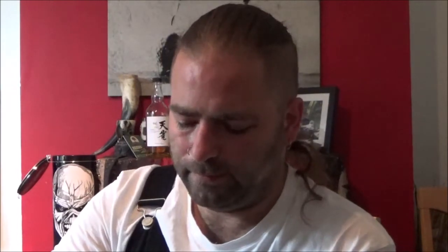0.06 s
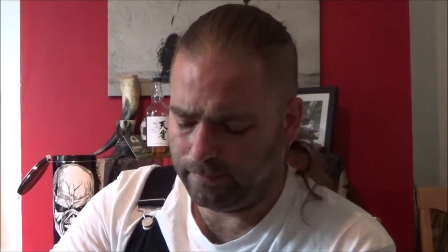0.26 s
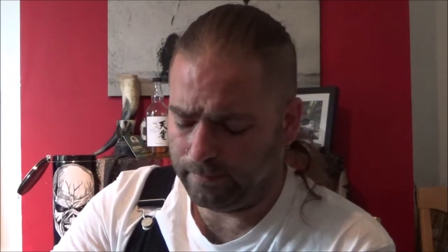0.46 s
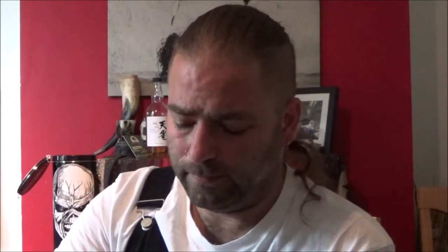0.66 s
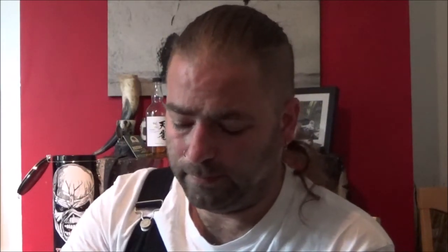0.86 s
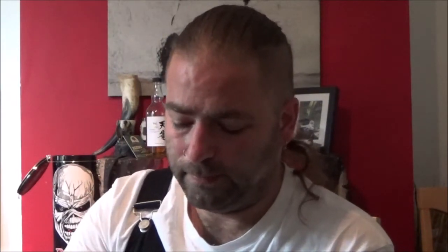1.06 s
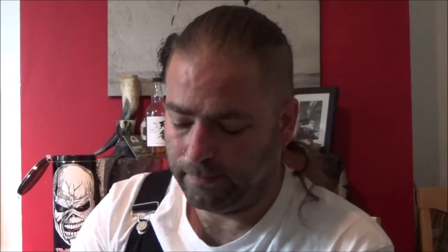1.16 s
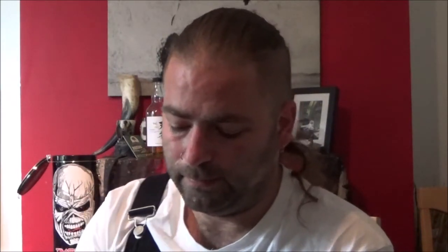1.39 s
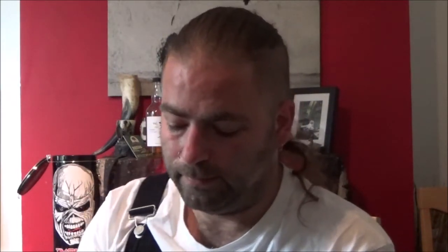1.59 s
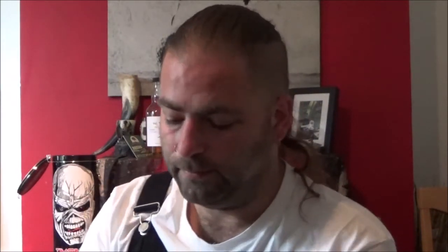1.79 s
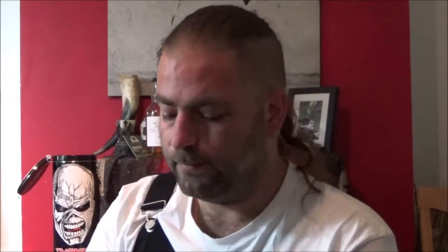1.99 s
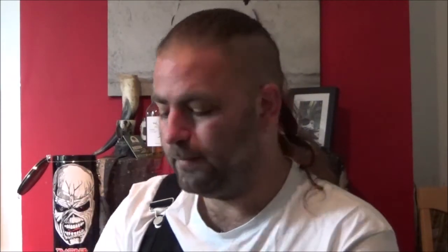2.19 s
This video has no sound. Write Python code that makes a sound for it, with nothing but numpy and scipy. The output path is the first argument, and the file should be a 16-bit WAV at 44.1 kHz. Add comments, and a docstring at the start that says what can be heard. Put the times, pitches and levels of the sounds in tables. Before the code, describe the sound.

Someone opens a drink can in a small room, then handles it with light taps.

```python
"""A drink can opened in a small, hard-walled room, about a metre from a camera's stereo microphone.
Room hiss and a faint ticking whine run throughout. After a soft rustle the seal cracks with a spit
of gas (0.25 s). Gas seeps, the tab clicks as it levers the lid (0.53 s), then the score tears and the
flap snaps in with a second spit, ringing the open can (0.77 s). Light rustles, taps and knocks of
handling follow. A fast limiter holds down the peaks."""
import sys
import numpy as np
from scipy import signal
from scipy.fft import rfft, irfft, next_fast_len
from scipy.io import wavfile
from scipy.ndimage import uniform_filter1d, minimum_filter1d

SR = 44100
rng = np.random.default_rng(int(sys.argv[2]) if len(sys.argv) > 2 else 0)


def generate_wav(sig):
    """Save sig (samples, or channels by samples) to the path in sys.argv[1] as 16-bit PCM at SR."""
    pcm = np.round(np.clip(np.atleast_2d(sig).T, -1, 1) * 32767).astype(np.int16)
    wavfile.write(sys.argv[1], SR, pcm)


N = 99225

# room tone spectrum (frequency [Hz], level [dB])
HISS_COLOUR = [(15, -25), (25, -10), (141, -3.5), (362, -3.5), (422, -4), (685, 0.5), (1200, -5),
               (1590, -3), (2710, -11), (3500, -8.5), (4070, -11), (4510, -12), (11000, -20.5),
               (14300, -29), (22000, -120)]
# hands and cloth sliding (start [s], hold [s], level [dB], tilt [dB/octave])
RUSTLES = [(0.147, 0.075, -54, 0), (0.887, 0.04, -50.5, 2.5), (1.083, 0.18, -57.5, 0),
           (1.716, 0.046, -50, -2), (1.831, 0.012, -49.5, 2), (2.101, 0.045, -52, -1), (2.173, .09, -51, 4)]
# rustle spectrum (frequency [Hz], level [dB])
RUSTLE_COLOUR = [(50, -38), (150, -4.5), (400, -3), (800, 0), (1500, -5.5), (3000, -8), (5000, -11),
                 (6500, -16), (8500, -12.5), (11000, -27)]
# tail off the walls (frequency [Hz], level [dB], t60 [s])
ROOM_TAIL = [(195, -33, 0.9), (740, 2.5, 0.28), (1610, 4, 0.24), (3970, 4, 0.24), (6940, 1, 0.24),
             (11200, -2, 0.23)]
# escaping gas (start [s], hold [s], level [dB])
GAS_SPITS = [(0.2436, 0.052, -26.5), (.768, 0.042, -28)]
# spit spectrum (frequency [Hz], level [dB])
GAS_COLOUR = [(300, -19.5), (1000, -25), (1500, -2.5), (2000, -14), (2700, -2.5), (3300, -2.5), (4000, 3.5),
              (4900, -2), (5400, -7), (6100, -5), (8000, 5.5), (9200, 1), (11000, -6)]
# seal cracking (time [s], level [dB])
SEAL_CRACKS = [(.2467, 11), (.2477, -1.5)]
# crack spectrum (frequency [Hz], level [dB])
CRACK_COLOUR = [(300, -33), (950, -28), (1500, 5), (1950, -1), (2600, 5.5), (3400, -2.5), (4400, 7.5),
                (6300, 5), (7300, 2), (8800, -1), (10300, -3.5)]
# seeping gas spectrum (frequency [Hz], level [dB])
SEEP_COLOUR = [(3000, -20.5), (4500, -10), (4950, -2), (5100, -3), (5300, -4), (5700, -20), (8000, -32)]
# tab levering and tearing the lid (time [s], level [dB], low cut [Hz])
TAB_CLICKS = [(.5331, 0, 1490), (.5338, -9.5, 1400), (.7335, -35.5, 1500), (.7408, -20.5, 1560),
              (.7425, -10, 1630), (.7470, -14.5, 1360), (.7505, -16, 1380), (.7523, -6.5, 1450),
              (.7562, -5.5, 1700), (.7571, -9.5, 1620)]
# modes of the closed lid (frequency [Hz], level [dB], t60 [s])
LID_MODES = [(1460, -26, 0.029), (1603, -22.5, 0.021), (1835, -15, 0.012), (3760, -27.5, 0.046),
             (4410, -13, 0.0088), (4700, -29, 0.011), (5320, -29, .01), (5906, -16.5, .018),
             (6254, -19.5, 0.023), (7690, -12, 0.006), (8400, -26, 0.0075), (9570, -24.5, 0.037)]
# spectrum of a tab click's rough edge (frequency [Hz], level [dB])
TAB_EDGE = [(500, -8), (1600, 2.5), (2400, -6), (3200, -6), (4400, 4.5), (6100, 1.5), (6900, -9.5),
            (7800, 14.5), (8500, -4.5), (11000, -7)]
# flap snapping in (time [s], level [dB], low cut [Hz])
FLAP_SNAPS = [(.7665, 0.5, 810), (.7678, -8.5, 800), (.7705, -10.5, 610), (.7790, -10, 386),
              (.7890, -7, 405), (.7950, -9.5, 390)]
# modes of the open can (frequency [Hz], level [dB], t60 [s])
CAN_MODES = [(644, -43, 0.033), (820, -27.5, 0.035), (892, -20, 0.029), (1034, -33.5, 0.014),
             (1257, -28, 0.035), (1760, -25.5, 0.036), (2370, -35, 0.033), (2890, -44, .02),
             (3585, -20, 0.036), (5080, -31, .015), (4860, -22, .015), (8300, -33, .015),
             (8330, -21, 0.016), (10450, -23, 0.023)]
# spectrum of a snap's rough edge (frequency [Hz], level [dB])
SNAP_EDGE = [(300, -9), (600, -12), (900, 7.5), (1400, 4.5), (3500, 8), (5000, 8), (6700, 2.5), (8500, 11),
             (11000, 6)]
# handling taps (time [s], level [dB], tilt [dB/octave], room send [dB])
TAPS = [(1.032, -25.5, 6, 0), (1.2685, -19, 7, -15), (1.414, -28, -3, 1.5), (1.433, -30, -8, 4),
        (2.0649, -4, -1.5, -7), (2.0706, -16, -7, -3), (2.215, -20, -4.5, -3.5)]
# tap spectrum (frequency [Hz], level [dB])
TAP_COLOUR = [(300, -31.5), (800, -12), (1400, -1), (2000, -5), (2700, 4.5), (3800, -4.5), (4800, -5),
              (6500, -10.5), (9200, -3), (11000, -24)]
# hollow handling knocks (time [s], pitch [Hz], level [dB], t60 [s])
KNOCKS = [(1.266, 221, -48, 0.048), (1.412, 1340, -46, .04), (1.435, 1270, -45.5, .04),
          (2.213, 1043, -37, 0.036)]

TOP_HZ = 11050
TIME = np.arange(N) / SR


def undb(db):
    """Decibels to gain."""
    return 10 ** (np.asarray(db) / 20)


def on_log(hz, points, column=1):
    """A table's column, joined by straight lines over log frequency."""
    table = np.array(points, float)
    return np.interp(np.log(hz + 1), np.log(table[:, 0]), table[:, column])


def colour(x, points, tilt_db=0):
    """Causal filter of unit power gain with the given spectrum and tilt per octave."""
    size = next_fast_len(2 * N) // 2 * 2
    hz = np.arange(size // 2 + 1) * SR / size
    gain = undb(on_log(hz, points) + tilt_db * np.log2(np.clip(hz, 500, TOP_HZ)))
    gain /= np.sqrt(np.mean(gain[hz < TOP_HZ] ** 2))
    cepstrum = irfft(np.log(gain))
    cepstrum[1:size // 2] *= 2  # fold to minimum phase
    cepstrum[size // 2 + 1:] = 0
    return irfft(rfft(x, size) * np.exp(rfft(cepstrum)))[..., :N]


def fade(t, t60):
    """Exponential decay from time zero."""
    return np.exp(-np.log(1000) * np.clip(t / t60, 0, 10))


def swell(start, hold, rise, t60):
    """Attack, hold and release; times in seconds."""
    t = TIME - start
    return np.clip(t / rise, 0, 1) * fade(t - hold, t60)


def strike(rows, response):
    """Play a response at each (time [s], level [dB])."""
    out = np.zeros(N)
    for start, db in rows:
        i = int(start * SR)
        out[i:] += undb(db) * response[:N - i]
    return out


def crackle(t60):
    """A very short noise burst of unit energy, like tiny fractures."""
    burst = rng.standard_normal(N) * fade(TIME, t60)
    return burst / np.sqrt(np.sum(burst ** 2))


def ring(modes):
    """Damped modes after one blow."""
    t = TIME[:SR // 2]
    ringing = sum(undb(db) * np.sin(2 * np.pi * hz * t) * fade(t, t60) for hz, db, t60 in modes)
    return np.pad(ringing, (0, N - len(t)))


def stereo_noise(side_db, alike_below_hz=223):
    """Noise that is mostly alike left and right, most of all in the bass."""
    mid, side = rng.standard_normal((2, N))
    side = signal.sosfilt(signal.butter(1, alike_below_hz, "high", fs=SR, output="sos"), side)
    return mid + undb(side_db) * side * np.array([[1], [-1]])


def room_hiss():
    """Steady room tone at the microphone."""
    return undb(-52.5) * colour(stereo_noise(side_db=-6), HISS_COLOUR)


def whine(hz=3500, period_s=0.04, first_s=0.029, half_width_s=0.0035):
    """A faint tone that pulses evenly, like a small camera motor."""
    from_pulse = (TIME - first_s + period_s / 2) % period_s - period_s / 2
    pulses = np.exp(-(from_pulse / half_width_s) ** 2)
    phase_wander = np.cumsum(rng.standard_normal(N)) * 0.033
    return undb(-52.5) * pulses * np.sin(2 * np.pi * hz * TIME + phase_wander)


def rustles():
    """Soft sliding of hands and cloth."""
    out = np.zeros(N)
    for start, hold, db, tilt in RUSTLES:
        friction = swell(start, hold, rise=0.011, t60=0.22) * rng.standard_normal(N)
        out += undb(db) * colour(friction, RUSTLE_COLOUR, tilt)
    return out


def room_reflections(x, level_db=1.5, gap_s=0.0017, build_s=0.02):
    """Reflections off the hard walls thicken for a moment, then die away, the treble first."""
    hz, when, cells = signal.stft(stereo_noise(side_db=-7.5), SR, nperseg=256)
    gain = undb(on_log(hz, ROOM_TAIL))[:, None]
    t60 = on_log(hz, ROOM_TAIL, column=2)[:, None]
    tail = signal.istft(cells * gain * fade(when, t60), SR)[1][:, :N]
    tail *= np.clip((TIME - gap_s) / build_s, 0, 1) ** 0.43
    tail *= undb(level_db) / np.sqrt(np.sum(tail ** 2) / 2)
    return signal.fftconvolve(x[None], tail[:, :SR], axes=1)[:, :N]


def gas_spits():
    """Short spits of gas through the opening."""
    flow = sum(undb(db) * swell(start, hold, rise=0.0075, t60=0.065) for start, hold, db in GAS_SPITS)
    return colour(flow * rng.standard_normal(N), GAS_COLOUR)


def seal_crack():
    """The score gives way with a double crack."""
    return colour(strike(SEAL_CRACKS, crackle(t60=0.0073)), CRACK_COLOUR)


def gas_seep():
    """Gas seeps thinly through the cracked seal as the tab lifts."""
    flow = undb(-50.5) * swell(start=0.465, hold=0.043, rise=0.021, t60=0.08)
    return colour(flow * rng.standard_normal(N), SEEP_COLOUR)


def metal_clicks(rows, modes, edge_colour, edge_db, edge_t60):
    """Each click has a rough edge and rings the thin metal, which is too small to radiate bass."""
    body, out = ring(modes), np.zeros(N)
    for start, db, low_hz in rows:
        edge = undb(edge_db) * colour(crackle(edge_t60), edge_colour)
        low_cut = signal.butter(6, low_hz, "high", fs=SR, output="sos")
        out += signal.sosfilt(low_cut, strike([(start, db)], body + edge) + 1e-12)
    return out


def tab_clicks():
    """The tab levers and tears the lid, ringing it while it is still closed."""
    return metal_clicks(TAB_CLICKS, LID_MODES, TAB_EDGE, edge_db=9, edge_t60=0.011)


def flap_snaps():
    """The flap snaps inward and rings the open can."""
    return metal_clicks(FLAP_SNAPS, CAN_MODES, SNAP_EDGE, edge_db=6.5, edge_t60=0.0047)


def taps():
    """Light handling taps: the sound straight to the microphone, and the share sent to the walls."""
    direct, to_walls = np.zeros((2, N))
    for start, db, tilt, send_db in TAPS:
        tap = colour(strike([(start, db)], crackle(t60=0.017)), TAP_COLOUR, tilt)
        direct += tap
        to_walls += undb(send_db) * tap
    return direct, to_walls


def knocks():
    """Faint dry knocks close by, each with one short resonance."""
    return sum(strike([(start, db)], ring([(hz, 0, t60)])) for start, hz, db, t60 in KNOCKS)


def scene(left_louder_db=1.66, tab_send_db=-7):
    """Can and hands a metre off, just left of centre, with their reflections and the background."""
    tab, flap = tab_clicks(), flap_snaps()
    full_send = flap + seal_crack() + gas_spits() + gas_seep() + rustles()
    tap_direct, tap_to_walls = taps()
    pan = undb(np.array([[left_louder_db], [-left_louder_db]]) / 2)
    direct = (full_send + tab + tap_direct + knocks()) * pan
    to_walls = full_send + undb(tab_send_db) * tab + tap_to_walls
    return direct + room_hiss() + room_reflections(to_walls) + whine()


def record(dry, ceiling=0.68, hold_s=0.0019):
    """A fast limiter holds down the highest peaks; the top is cut steeply."""
    window = int(hold_s * SR)
    gain = ceiling / np.maximum(np.abs(dry).max(axis=0), ceiling)
    smooth_gain = uniform_filter1d(minimum_filter1d(gain, window), window)
    high_cut = signal.ellip(10, 0.1, 50, TOP_HZ, fs=SR, output="sos")
    return signal.sosfiltfilt(high_cut, dry * smooth_gain)


dry = scene()
out = record(dry)
generate_wav(out)
```